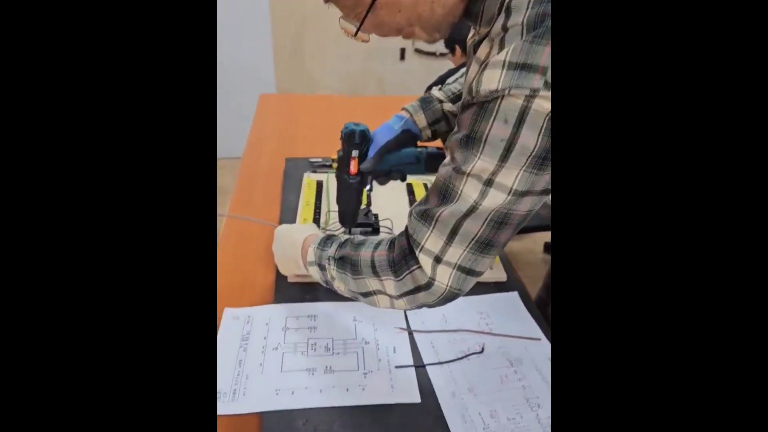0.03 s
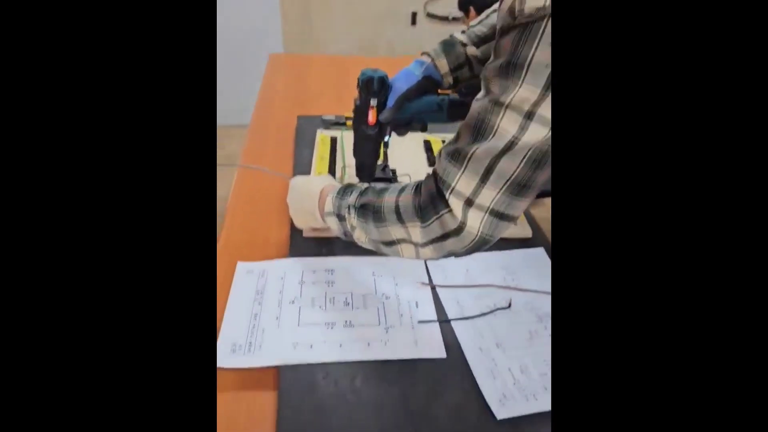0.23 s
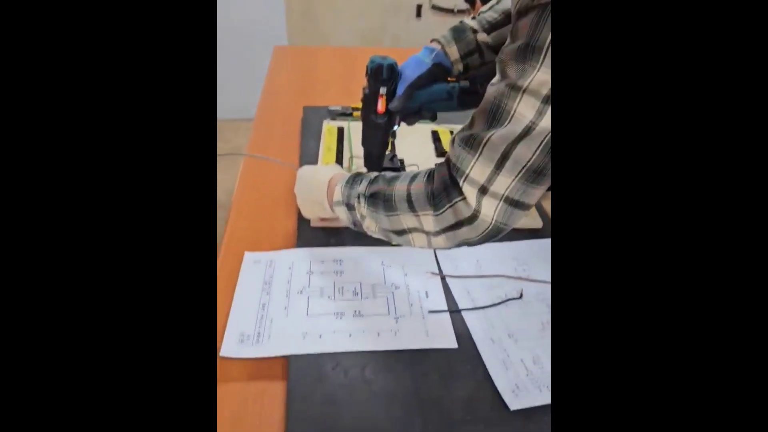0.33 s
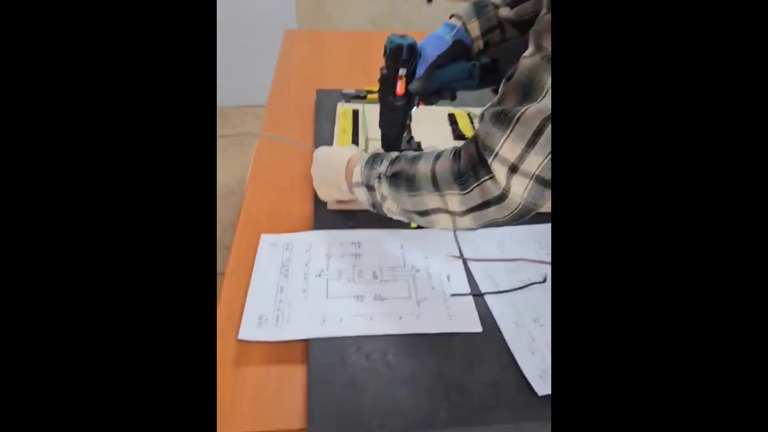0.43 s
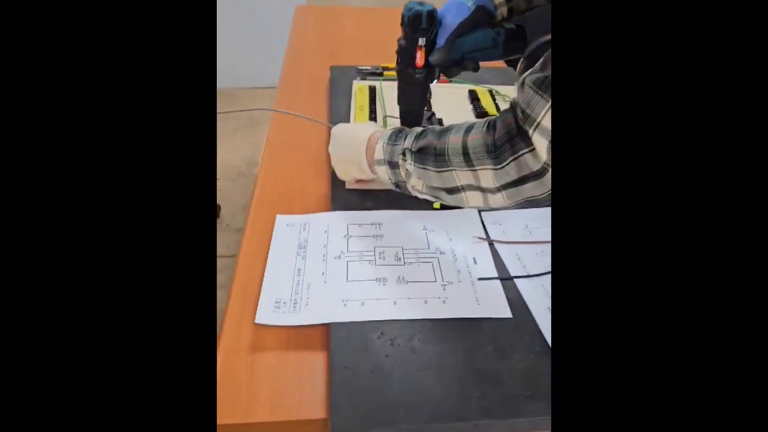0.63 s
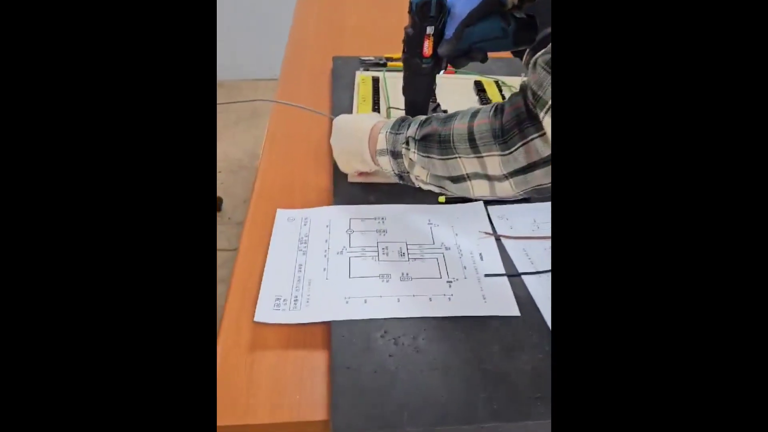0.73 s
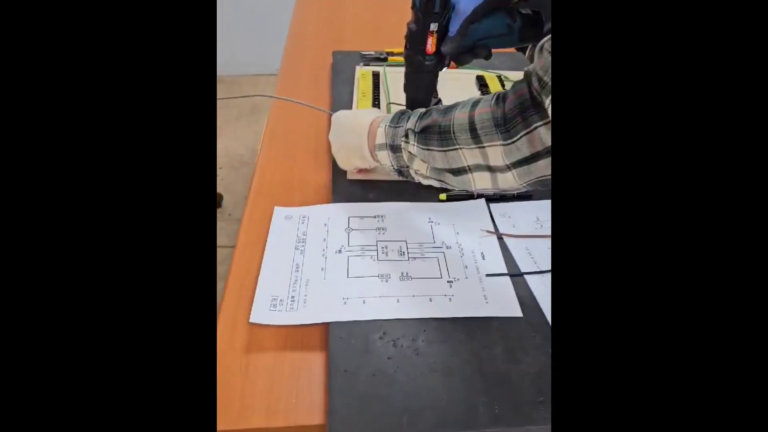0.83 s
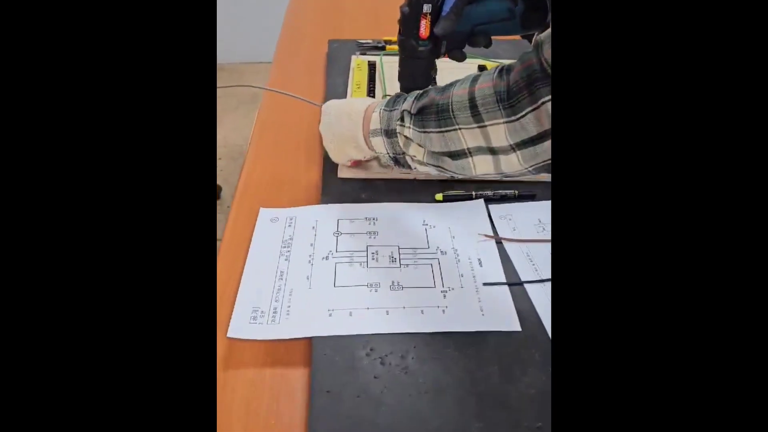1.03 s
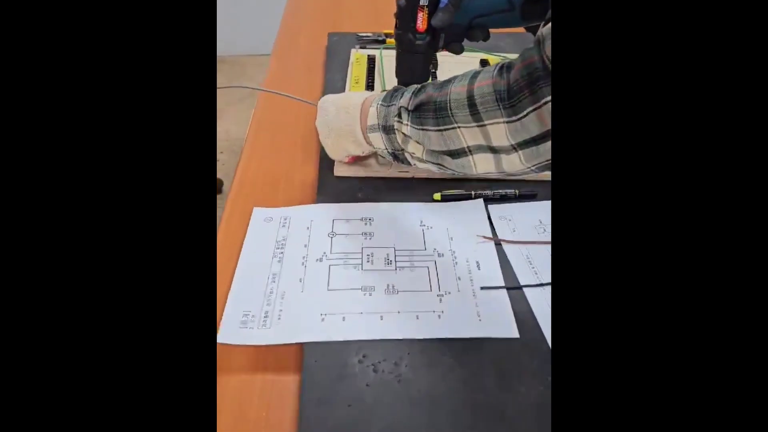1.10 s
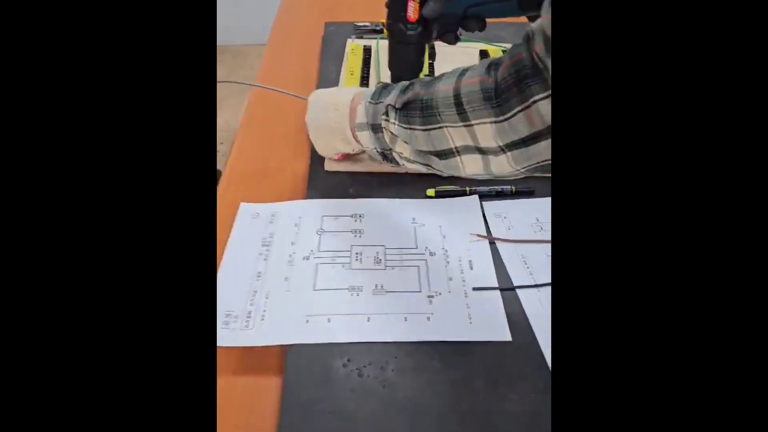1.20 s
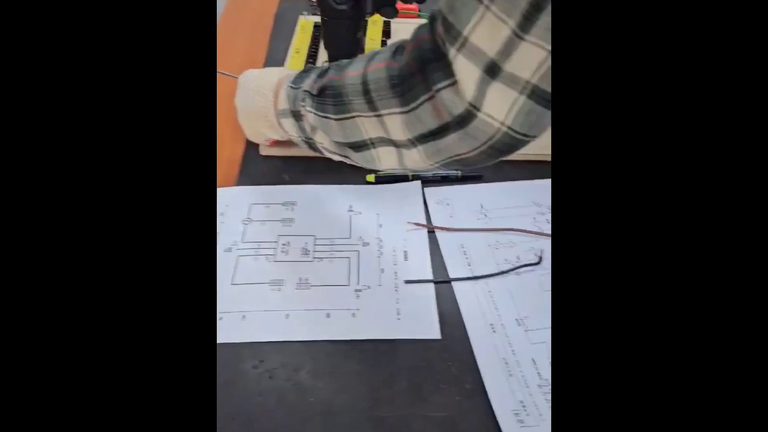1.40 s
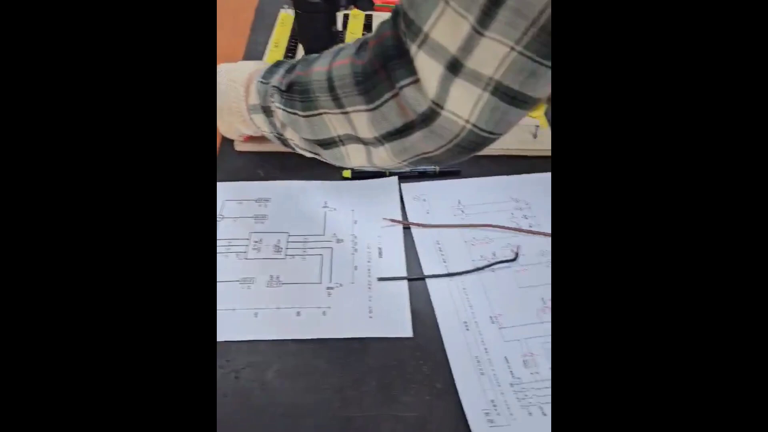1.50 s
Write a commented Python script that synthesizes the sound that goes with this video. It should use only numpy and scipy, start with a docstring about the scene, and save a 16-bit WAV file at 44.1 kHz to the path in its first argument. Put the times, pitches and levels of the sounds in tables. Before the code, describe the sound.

A cordless drill driving a screw into a board: quiet room noise and a faint trigger tick at 0.06 seconds, then a whirr rising quickly from 0.1 to 0.3 and holding. At 0.67 a hard clack, then from 0.77 to 1.14 loud knocks about twenty a second, with steely clicks. The motor stops near 1.15; short room echo, faint low hum and room noise remain until 1.55.

```python
"""Quiet room noise is heard first, then a faint trigger tick and a cordless drill spinning up to drive a screw
into a board on a table: filtered noise pulsing with the shaft, tones at shaft orders and rumble in the board.
The bit then jumps out of the screw head, the main thumps about twenty a second: damped board modes,
with noise cracks and steel rings as clacks. The trigger is let go and a low, wavering sine hums in the table.
The room is small and hard; a hand-held pair of microphones turns slowly past."""
import sys
import numpy as np
from scipy import signal
from scipy.fft import rfft, irfft, next_fast_len
from scipy.io import wavfile
from scipy.ndimage import uniform_filter1d, map_coordinates

SR = 44100
rng = np.random.default_rng(int(sys.argv[2]) if len(sys.argv) > 2 else 0)


def unload_wav(signal):
    """Save mono or channel-first audio to the path in sys.argv[1] as 16-bit WAV at rate SR, clipped to [-1, 1]."""
    wavfile.write(
        sys.argv[1],
        SR,
        np.round(np.clip(np.atleast_2d(signal).T, -1, 1) * 32767).astype(np.int16),
    )


def makeup_ratio(level_db):
    """Linear amplitude ratio for a level in decibels (20 dB per factor of ten)."""
    decades = np.asarray(level_db, float) / 20
    return 10 ** decades


N = 68355  # samples

# Spectrum of the room air. Each row: frequency in Hz, relative density in dB.
AIR_SPECTRUM = [(12, -39), (20, -7), (93, -10), (343, -17), (405, -21), (1170, -36.5), (1930, -38.5),
                (2220, -44.5), (4710, -46), (6570, -49.5), (7990, -50.5), (11500, -51), (15600, -52)]
# Left-right likeness of the room air. Each row: frequency in Hz, correlation.
AIR_LIKENESS = [(30, .7), (80, .9), (200, .9), (1000, .4), (4000, .1)]
# Slow swell of the room air. Each row: time in seconds, level in dB added to AIR_DB.
AIR_SWELL = [(0, -4.5), (.1, 0), (.6, -3.5), (1.2, 2), (1.35, -0.5), (1.45, -2), (1.52, 1), (1.55, 2.5)]
AIR_DB, AIR_LUMP_DB = -45, 2

# Trigger tick. Each row: start in seconds, frequency in Hz, level in dB, t60 in seconds.
TRIGGER_TICKS = [(.058, 1750, -49, 0.02)]

# Decay of the room. Each row: frequency in Hz, t60 in seconds.
ROOM_DECAY = [(100, 0.89), (300, 0.48), (1000, 0.34), (3000, 0.32), (8000, 0.27), (14000, .22)]
# Left-right likeness of every reflected tail. Each row: frequency in Hz, correlation.
TAIL_LIKENESS = [(100, 1), (400, 0.56), (1000, 0.22), (4000, 0.089)]
# Decay of the table top and nearby things. Each row: frequency in Hz, t60 in seconds.
NEAR_DECAY = [(200, 0.14), (2000, 0.021), (12000, 0.013)]
# Strength of those near reflections. Each row: frequency in Hz, gain in dB.
NEAR_GAIN = [(100, -28), (500, -5.5), (1500, 4), (12000, 3.5)]
ROOM_DB = -4
RING_TO_NEAR_DB = -9  # the steel rings reach the table top less

# Board and table-top modes. Each row: frequency in Hz, relative level in dB, t60 in seconds.
BOARD_MODES = [(80, -22, 0.4), (106, -15.5, 0.18), (134, -15, 0.16), (154.4, -6, 0.084),
               (187.5, -18, 0.057), (206.9, -21, 0.15), (250.9, -21.5, 0.099), (315, -21, 0.069),
               (356.3, -12, 0.12), (449, -9, 0.046), (578, 1.5, 0.016), (521, -8, 0.041), (619, -16, 0.028),
               (662.3, -10.5, 0.046), (827, -13, 0.031), (870, -22, 0.023), (1093, -10, 0.031),
               (1450, -19, 0.016)]

# Motor speed. Each row: time in seconds, shaft speed in Hz before its waver.
SHAFT_SPEED = [(.1, 99.05), (.146, 184.4), (.2, 247.7), (.24, 275.9), (.3, 297.9), (.4, 301), (.64, 299.5),
               (.8, 294.4), (1.08, 292.2), (1.16, 150.4)]
# Motor strength. Each row: time in seconds, whirr level in dB before WHIRR_DB, board rumble level in dB.
MOTOR_LEVELS = [(0.06, -80, -52), (0.074, -92, -86), (0.152, -52, -43), (0.206, -46, -49.5),
                (0.488, -44.5, -57.5), (0.542, -45, -54.5), (0.666, -42.5, -40.5), (0.998, -38.5, -47),
                (1.006, -43.5, -55), (1.082, -35, -44), (1.2, -94, -48)]
# Brush and gear noise. Each row: frequency in Hz, relative density in dB.
WHIRR_SPECTRUM = [(290, -25), (500, -8.5), (639, -4.5), (717, -11.5), (928, -7), (1010, -18), (1290, 2.5),
                  (1770, -8), (2580, -4), (4720, -5), (8520, -6), (10700, -12), (13300, -5), (15600, -19.5)]
# Shaft orders. Each row: multiple of shaft speed, relative level in dB, pitch waver as a share.
SHAFT_ORDERS = [(0.536, -8, .015), (0.788, -12, 0.022), (1.004, -9, 0.007), (2.088, -13, .015),
                (4.783, -16, .035), (12, -26, .003), (15.12, -17, 0.0031), (28.2, -20, 0.00306)]
# Whine strong while the bit runs free, sinking under load. Each row: time in seconds, gain in dB.
WHINE_LEVEL = [(.1, 8), (.2, 0), (.32, 0.5), (.44, 4.5), (.55, -4), (.66, 6), (.85, -1.5), (1.2, 6.5)]
# Gear tones. Each row: time in seconds, gear tone and its lower octave in dB against the whirr.
GEAR_TONES = [(.1, -19, -15), (.2, -4.5, -3), (.26, -9.5, -11), (.32, -3, -15), (.42, -8, -31),
              (.46, -18, -20), (.52, -9, -30), (.6, -18.5, -36), (.7, -15, -27), (1.2, -33, -28)]
GEAR_ORDER = 6  # gear cycles a shaft turn
SPEED_WAVER, BRUSH_DEPTH = .004, 0.27  # shares of speed and of noise amplitude
WHIRR_DB, GRIT_DB, RUMBLE_LUMP_DB = 6.5, .6, 3
WHINE_WAVER_DB, FLUTTER_DB = 3.5, 3

# Steel clacks. Each row: start in seconds, crack level in dB, low ring frequency in Hz,
# then low, middle and high ring levels in dB before RING_DB.
CLACKS = [(.159, -24.5, 3170, -30, -34, -50), (0.6694, -11, 3130, -34, -48, -14.5),
          (.674, -21, 3200, -26, -46, -48), (0.78, -14, 2850, -14, -28, -29),
          (0.83, -17, 3700, -25, -46.5, -39), (.878, -12, 3160, -30, -23, -40),
          (0.883, -9, 3340, -17, -17.5, -35), (.926, -10, 3200, -26, -19, -36),
          (.931, -17, 3200, -26, -16, -31), (.981, -11, 3240, -21, -13, -35),
          (1.027, -17.5, 3670, -18, -24, -16), (1.033, -18, 3600, -31, -39, -29),
          (1.07, -13.5, 2980, -24, -24.5, -25), (1.0768, -14, 3280, -5, -11, -35.5),
          (1.078, -13, 2900, -18.5, -31, -14.5), (1.091, -36, 3100, -37, -28, -22),
          (1.095, -24.5, 2490, -38, -45, -42.5), (1.1438, -17, 2850, -17.5, -24.5, -28)]
# Middle and high rings of bit and chuck. Each row: frequency in Hz, t60 in seconds.
STEEL_RINGS = [(4350, 0.0071), (7450, 0.0095)]
# Pitch scatter of the partials, as a share. Each row: low, middle, then high ring.
RING_SCATTER = [
    [[.07]],
    [[.035]],
    [[.025]],
]
# Response of crack and rattle. Each row: frequency in Hz, gain in dB.
CRACK_RESPONSE = [(300, -21), (700, 0), (1500, 6), (3000, -0.5), (5000, -2.5), (8000, -10), (12000, -18),
                  (16000, -32)]
RING_DB, RING_PARTS, LOW_RING_T60 = 7, 3, 0.0062  # dB, partials a ring, s
CRACK_DB, CRACK_T60 = -0.5, 0.009  # dB, s
RATTLE_DB, RATTLE_T60, RATTLE_RISE_S = -10, 0.09, 0.0035  # dB, s, s
STRIKE_RISE_S = 0.00039  # onset of steel rings and trigger tick

# Bit dropping back on the board. Each row: start in seconds, level in dB before THUMP_DB,
# extra level in dB of the deep modes, extra level in dB of the body modes.
THUMPS = [(0.6668, -13, 0.5, -4.5), (0.735, -40, 6, 16), (0.7737, -13.5, -3, 5.5), (0.798, -27, -10, 12.5),
          (0.8253, -14, 2, 0.5), (0.848, -27, -7, 4), (0.8747, -10.5, 1, 4), (0.8844, -22.5, 3, 10.5),
          (.9225, -13.5, 2, 1.5), (0.9312, -25.5, 7, 15.5), (0.9453, -25, 8, -5), (0.9736, -14.5, 2.5, -14),
          (1.0243, -15, 4, -4), (1.0685, -12.5, -2.5, 5.5), (1.0934, -19.5, -0.5, 2), (1.144, -27, 6.5, 8)]
DEEP_HZ, BODY_HZ, FLIP_HZ = 230, 400, 275  # group upper edges; the sign of the modes flips at FLIP_HZ
DEEP_RISE_S, RISE_S = 0.0032, 0.00085
MODE_SCATTER_DB, MODE_DETUNE = 2.5, .012  # spread of level, and of pitch as a share
THUMP_DB, BOUNCE_S, BOUNCE_DB = 1.5, 0.0036, -11

# Table hum. Each row: time in seconds, level in dB.
HUM_LEVEL = [(1.1, -42), (1.15, -36), (1.262, -38.5), (1.36, -41), (1.388, -49), (1.434, -74),
             (1.516, -36.5), (1.55, -44)]
HUM_HZ, HUM_WAVER = 72.1, 0.0213  # mean pitch, spread as a share

# Direction of the drill. Each row: time in seconds, left-ear lead in ms, left minus right in dB.
AIM = [(0, 0.024, 3.5), (.5, 0.2, 4), (1.1, 0.3, 4), (1.55, 0.2, 5)]
# Straight path shaded by arm and tool. Each row: frequency in Hz, gain in dB.
DIRECT_GAIN = [(300, -1.5), (1000, -1.5), (4000, -0.5), (12000, -1)]
# Shadow cast by the device. Each row: frequency in Hz, left minus right in dB.
DEVICE_SHADOW = [(100, -4.5), (300, -2), (1000, -4.5), (4000, -3), (9000, 0.5), (14000, -3)]
BASS_CUT_HZ, TOP_HZ = 28, 15740


def unit(x):
    """Normalization: scale a signal to rms 1."""
    return x / np.sqrt(np.mean(x ** 2) + 1e-20)


def along(points, hz):
    """Interpolation on a logarithmic frequency axis through (Hz, value) points."""
    f, v = np.transpose(points)
    return np.interp(np.log(hz + 1), np.log(f + 1), v)


def curves(rows, edge=None):
    """Linear interpolation in time: one value per sample for each column after the time."""
    s, *cols = np.transpose(rows)
    return [np.interp(np.arange(N) / SR, s, c, edge, edge) for c in cols]


def wobble(rate):
    """Spline interpolation of random knots, rate a second, giving a smooth fluctuation."""
    knots = rng.standard_normal(int(N * rate / SR) + 4)
    return map_coordinates(knots, [np.arange(N) * rate / SR])


def filtered(x, response):
    """Linear filtering: the spectrum multiplied by a response of frequency."""
    m = next_fast_len(x.shape[-1] + 8192)
    return irfft(rfft(x, m) * response(np.fft.rfftfreq(m, 1 / SR)), m)[..., :x.shape[-1]]


def shaped(x, points):
    """Spectral shaping by a gain curve of (Hz, dB) points."""
    return filtered(x, lambda hz: makeup_ratio(along(points, hz)))


def paired(two, alike):
    """Interaural coherence: unrelated signals become mid and side for a likeness by frequency."""
    def mid_side_gains(hz):
        angle = np.arccos(np.clip(along(alike, hz), -1, 1)) / 2
        return np.array([np.cos(angle), np.sin(angle)])
    mid, side = filtered(two, mid_side_gains)
    return np.array([mid + side, mid - side])


def air():
    """Partly diffuse background: low, lumpy noise with less left-right likeness in the treble."""
    noise = rng.standard_normal((2, N)) * makeup_ratio(AIR_LUMP_DB * wobble(11.75))
    swell_db, = curves(AIR_SWELL)
    return makeup_ratio(AIR_DB + swell_db) * unit(paired(shaped(noise, AIR_SPECTRUM), AIR_LIKENESS))


def trigger():
    """Damped oscillation: a quickly dying sine makes a faint plastic tick."""
    out, t = np.zeros(N + SR), np.arange(SR // 8) / SR
    for s, hz, db, t60 in TRIGGER_TICKS:
        envelope = makeup_ratio(db - 60 * t / t60) * (1 - np.exp(-t / STRIKE_RISE_S))
        out[round(s * SR):][:len(t)] += envelope * np.sin(2 * np.pi * hz * t)
    return out[:N]


def room(x, decays, size):
    """Diffuse reverberation: each stretch meets a fresh noise tail whose bands die at their own rates."""
    hop, delay = 4096, 40  # samples
    window = np.hanning(2 * hop)
    padded = np.concatenate([np.zeros(hop), x, np.zeros(2 * hop)])
    out = np.zeros((2, N + 2 * SR))
    for a in range(0, N + hop, hop):
        hz, t, z = signal.stft(rng.standard_normal((2, size)), SR, nperseg=128)
        t60 = along(decays, hz)[:, None]
        decaying = z * makeup_ratio(-60 * t / t60) / np.sqrt(t60)
        tail = signal.istft(decaying, SR, nperseg=128)[1]
        tail = tail / np.linalg.norm(tail[0])
        stretch = padded[a:a + 2 * hop] * window
        wet = signal.fftconvolve(stretch[None], tail, axes=1)
        out[:, a + delay:][:, :wet.shape[1]] += wet
    return paired(out[:, hop:][:, :N], TAIL_LIKENESS)


def board_response(hz):
    """Modal superposition: the board's response is a sum of damped resonances."""
    total = 0
    for center, db, t60 in BOARD_MODES:
        width = 12 + 2.8 / t60
        total = total + makeup_ratio(db) * 1j * hz * width / (center * center - hz * hz + 1j * hz * width)
    return total


def motor():
    """Rotational modulation: noise pulses with the shaft, tones follow its phase, rumble drives the board."""
    shaft_hz, = curves(SHAFT_SPEED)
    whirr_db, rumble_db = curves(MOTOR_LEVELS, edge=-120)
    free_db, = curves(WHINE_LEVEL)
    gear_db, octave_db = curves(GEAR_TONES)
    turn = 2 * np.pi * np.cumsum(shaft_hz * (1 + SPEED_WAVER * wobble(30))) / SR
    grit = rng.standard_normal(N) * makeup_ratio(GRIT_DB * wobble(900))
    whirr = unit(shaped(grit * (1 + BRUSH_DEPTH * np.cos(turn)), WHIRR_SPECTRUM))
    whine = np.zeros(N)
    for order, db, waver in SHAFT_ORDERS:
        level = makeup_ratio(db + free_db + WHINE_WAVER_DB * wobble(25) + FLUTTER_DB * wobble(90))
        drift = np.cumsum(2 * np.pi * shaft_hz * waver * wobble(20)) / SR
        whine += level * np.sin(order * (turn + drift))
    for order, db in [(GEAR_ORDER, gear_db), (GEAR_ORDER / 2, octave_db)]:
        whine += makeup_ratio(db + FLUTTER_DB * wobble(50)) * np.sin(order * turn + .5 * wobble(60))
    lumps = rng.standard_normal(N) * makeup_ratio(RUMBLE_LUMP_DB * wobble(61.5))
    rumble = unit(filtered(lumps, board_response))
    return makeup_ratio(whirr_db + WHIRR_DB) * (whirr + whine) + makeup_ratio(rumble_db) * rumble


def clacks():
    """Impact excitation: a noise crack, three short smeared steel rings and a loose chuck rattle."""
    rings, cracks, t = np.zeros(N + SR), np.zeros(N + SR), np.arange(SR // 8) / SR
    noise = rng.standard_normal((len(CLACKS), 2, len(t)))
    detune = 1 + RING_SCATTER * rng.standard_normal((len(CLACKS), 3, RING_PARTS, 1))
    ring_rise = 1 - np.exp(-t / STRIKE_RISE_S)
    rattle_envelope = makeup_ratio(RATTLE_DB - 60 * t / RATTLE_T60) * (1 - np.exp(-t / RATTLE_RISE_S))
    for (s, db, low_hz, *levels), (crack, rattle), parts in zip(CLACKS, noise, detune):
        at = round(s * SR)
        modes = [(low_hz, LOW_RING_T60)] + list(STEEL_RINGS)
        for ring_db, (hz, t60), shifts in zip(levels, modes, parts):
            partials = np.sin(2 * np.pi * hz * shifts * t).mean(axis=0)
            rings[at:][:len(t)] += makeup_ratio(ring_db + RING_DB - 60 * t / t60) * partials * ring_rise
        burst = makeup_ratio(CRACK_DB - 60 * t / CRACK_T60) * crack + rattle_envelope * rattle
        cracks[at:][:len(t)] += makeup_ratio(db) * burst
    return rings[:N], shaped(cracks[:N], CRACK_RESPONSE)


def thumps():
    """Modal excitation: each drop of the bit, and its quick bounce, sets the board's modes ringing."""
    out, t = np.zeros(N + SR), np.arange(SR // 2) / SR
    scatter = rng.standard_normal((len(THUMPS), len(BOARD_MODES), 2))
    for (s, db, deep_db, body_db), deviations in zip(THUMPS, scatter):
        ring = np.zeros(len(t))
        for (hz, mode_db, t60), (level_dev, pitch_dev) in zip(BOARD_MODES, deviations):
            group_db = deep_db if hz < DEEP_HZ else body_db if hz < BODY_HZ else 0
            rise = 1 - np.exp(-t / (DEEP_RISE_S if hz < DEEP_HZ else RISE_S))
            decay = makeup_ratio(mode_db + group_db + MODE_SCATTER_DB * level_dev - 60 * t / t60)
            tone = np.sin(2 * np.pi * hz * (1 + MODE_DETUNE * pitch_dev) * t)
            ring += np.sign(FLIP_HZ - hz) * rise * decay * tone
        for at, gain_db in [(s, 0), (s + BOUNCE_S, BOUNCE_DB)]:
            out[round(at * SR):][:len(t)] += makeup_ratio(db + THUMP_DB + gain_db) * ring
    return out[:N]


def hum():
    """Frequency modulation: a low sine of wavering pitch stands for the table's hum."""
    level_db, = curves(HUM_LEVEL, edge=-120)
    phase = 2 * np.pi * np.cumsum(HUM_HZ * (1 + HUM_WAVER * wobble(4.7))) / SR
    return np.sqrt(2) * uniform_filter1d(makeup_ratio(level_db), size=600) * np.sin(phase)


def scene():
    """Superposition and interaural difference: the drill reaches the left a little earlier and louder."""
    rings, cracks = clacks()
    dull = motor() + thumps() + cracks + trigger()
    drill = dull + rings
    lead_ms, pan_db = curves(AIM)
    sides = np.array([[.5], [-.5]])  # half of each difference, with opposite signs
    lead = lead_ms * SR / 1000  # samples
    direct = np.array([map_coordinates(drill, [np.arange(N) + k * lead], order=5) for k in (.5, -.5)])
    near = shaped(room(dull + makeup_ratio(RING_TO_NEAR_DB) * rings, NEAR_DECAY, size=3072), NEAR_GAIN)
    far = makeup_ratio(ROOM_DB) * room(drill, ROOM_DECAY, size=20480)
    heard = (shaped(direct, DIRECT_GAIN) + near + far) * makeup_ratio(sides * pan_db)
    shadowed = filtered(heard, lambda hz: makeup_ratio(sides * along(DEVICE_SHADOW, hz)))
    return shadowed + hum() + air()


def low_pass(x):
    """Removes everything above the highest recorded frequency."""
    return signal.sosfilt(signal.butter(12, 15740, fs=SR, output="sos"), x)


def record(dry):
    """High-pass response: the microphones lose the deep bass; a separate band limit ends the treble at TOP_HZ."""
    def bass_cut(hz):
        return (1j * hz / (BASS_CUT_HZ + 1j * hz)) ** 2
    mic = filtered(dry, bass_cut)
    mix = filtered(mic, lambda hz: hz < TOP_HZ)
    return low_pass(mix)


dry = scene()
out = record(dry)
unload_wav(out)
```